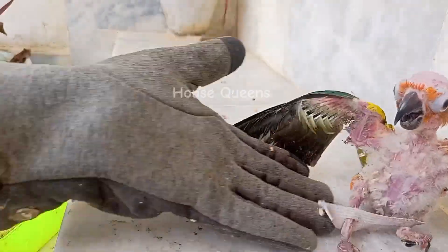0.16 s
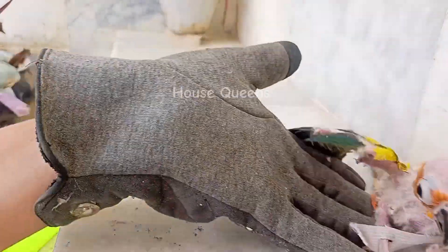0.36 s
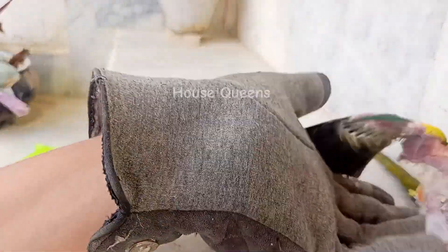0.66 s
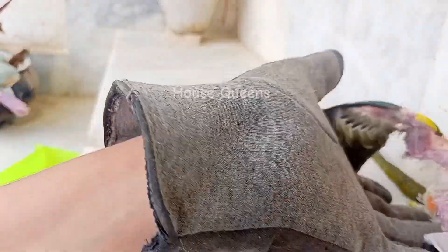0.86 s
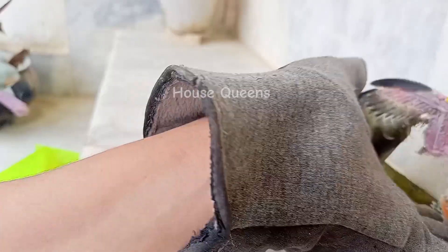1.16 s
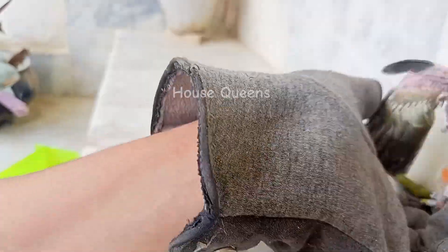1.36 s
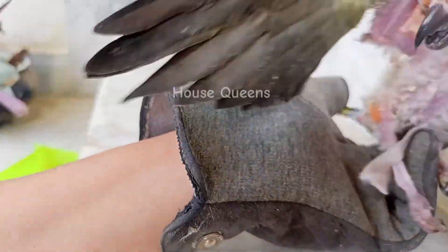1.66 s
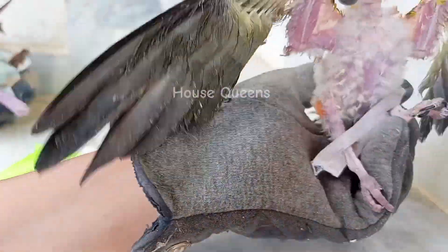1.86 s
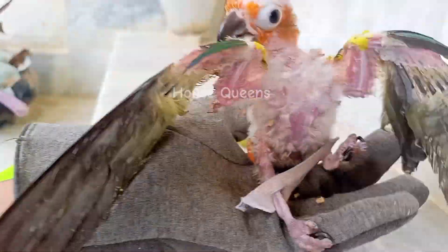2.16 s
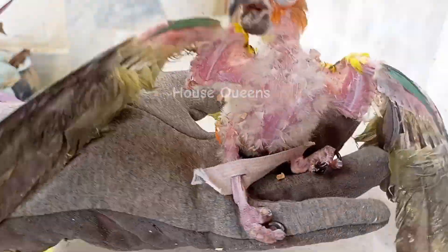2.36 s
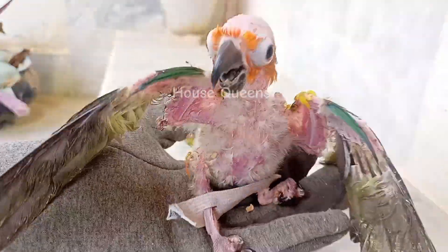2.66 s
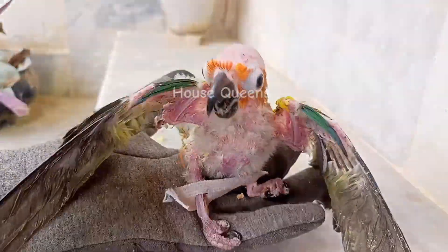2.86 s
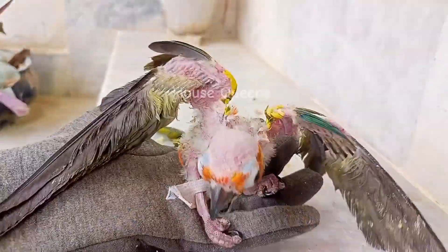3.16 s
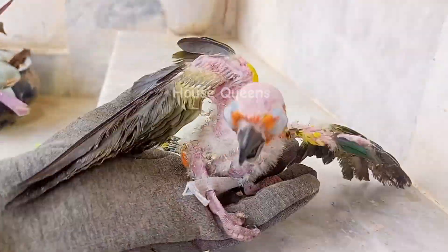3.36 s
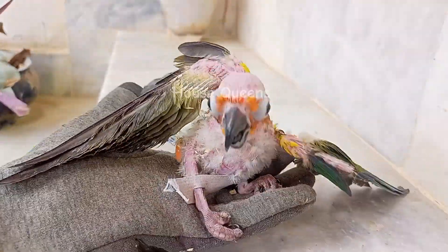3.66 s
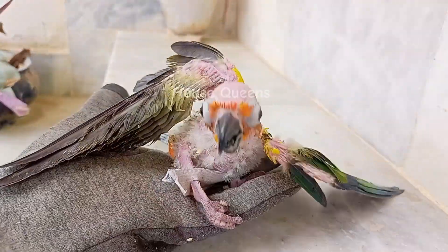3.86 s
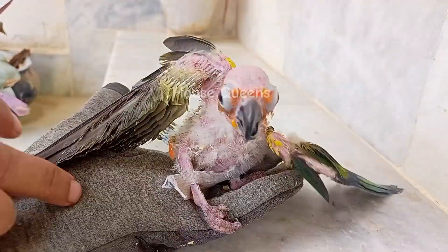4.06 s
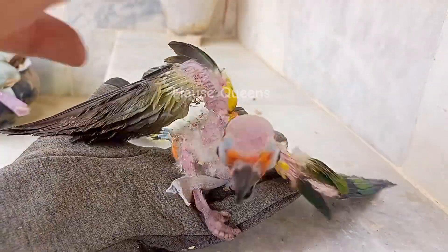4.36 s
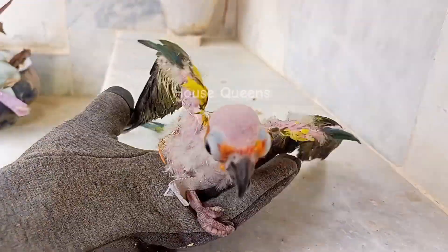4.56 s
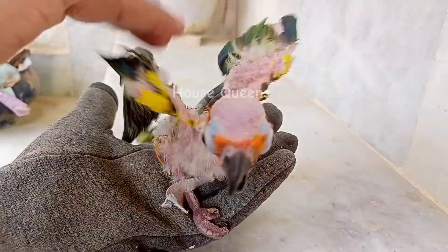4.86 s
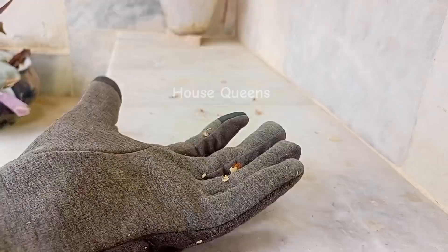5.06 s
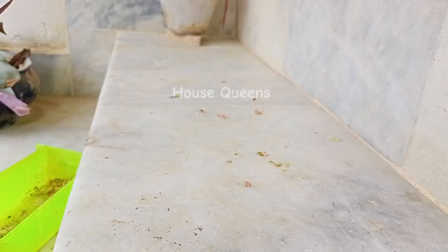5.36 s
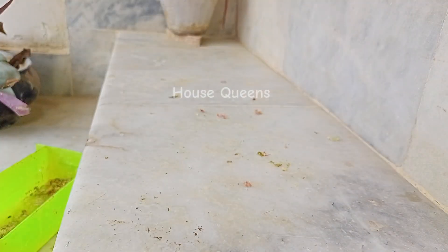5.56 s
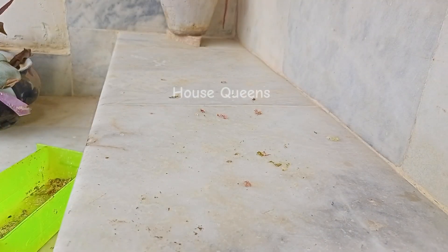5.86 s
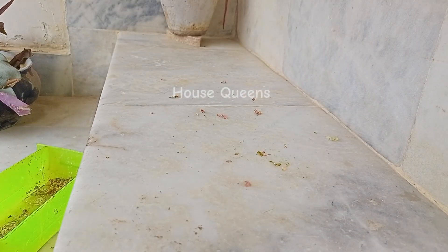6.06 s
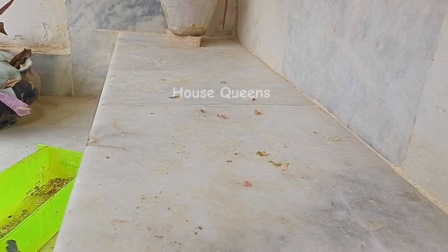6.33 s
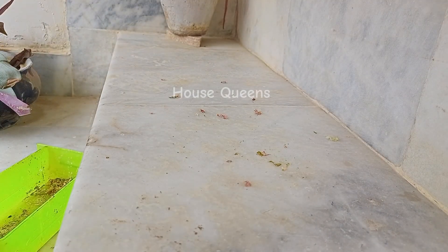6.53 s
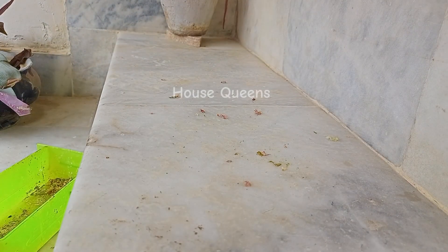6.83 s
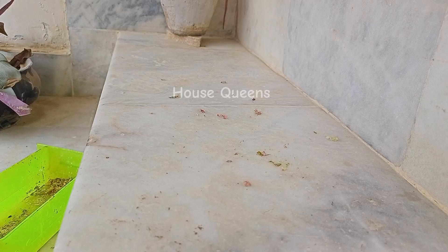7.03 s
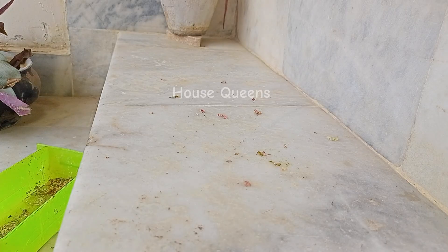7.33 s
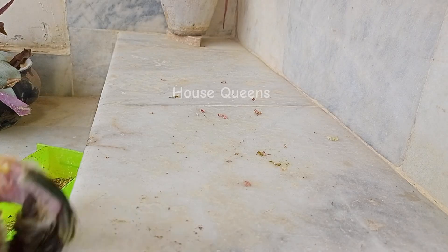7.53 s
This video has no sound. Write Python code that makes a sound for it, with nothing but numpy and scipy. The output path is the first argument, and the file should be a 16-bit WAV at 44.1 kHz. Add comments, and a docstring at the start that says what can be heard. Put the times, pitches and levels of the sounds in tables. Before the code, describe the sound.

Close to the microphone in a small tiled room, a parrot chick gives hoarse, rapid begging rasps and a sharp early squawk. The calls thin out with faint feather rustles, then three harsh squawks burst out in a row, followed by a brief stuttering squeak at take-off. After near quiet comes a soft landing thud, a stuttering protest, a faint wing rustle and final squawks, all over a low dull hum.

```python
"""Over a low room hum, a parrot chick on a gloved hand in a small tiled room begs in hoarse rasps and harsh squawks.
Its wings rustle; then it flutters off with a stuttering squeak, lands with a soft thud and protests and squawks again.
The voice is a stack of harmonics mixed with rough noise; the stutters are rows of short upward-sliding pulses.
Wings and room are shaped noise, the thuds are a few dying sine tones, and a fading noise makes the echo."""
import sys
import numpy as np
from scipy import signal
from scipy.fft import rfft, irfft, next_fast_len
from scipy.io import wavfile
from scipy.ndimage import uniform_filter1d, map_coordinates

SR = 44100
rng = np.random.default_rng(int(sys.argv[2]) if len(sys.argv) > 2 else 0)


def generate_wav(sig):
    """Save sig (samples, or channels by samples) to the path in sys.argv[1] as 16-bit PCM at SR."""
    pcm = np.round(np.clip(np.atleast_2d(sig).T, -1, 1) * 32767).astype(np.int16)
    wavfile.write(sys.argv[1], SR, pcm)


N = 339129
TIME = np.arange(N) / SR
TOP_HZ = 15850  # the microphone's upper limit

# Colour of the hoarse noise in the voice. Each row: frequency in Hz, relative level in dB per Hz.
RASP_COLOUR = [(1000, -50.5), (1700, -17), (2050, -24), (2330, -5.5), (2720, -3), (2960, 0), (3800, -6),
               (4090, -3), (5110, -10), (5660, -12), (6680, -17), (8420, -13), (9940, -27.5),
               (13400, -29.5), (15500, -35)]


def amp(db):
    """Turn decibels into a plain factor."""
    return 10 ** (np.asarray(db) / 20)


def unit(x):
    """Scale a sound to an rms (average strength) of 1."""
    return x / np.sqrt(np.mean(x ** 2) + 1e-20)


def along(points, hz):
    """Read a curve of (Hz, value) points, with frequency on a log axis."""
    f, v = np.transpose(points)
    return np.interp(np.log(hz + 1), np.log(f), v)


def wobble(rate, n):
    """A smooth random curve of n samples, through `rate` random points a second."""
    knots = rng.standard_normal(int(n * rate / SR) + 4)
    return map_coordinates(knots, [np.arange(n) * rate / SR])


def filtered(x, response):
    """Strengthen or weaken each frequency of x by response(hz)."""
    m = next_fast_len(len(x) + 8192)
    spectrum = rfft(x, m) * response(np.fft.rfftfreq(m, 1 / SR))
    return irfft(spectrum, m)[:len(x)]


def noise(colour):
    """Random hiss with the given colour and an rms of 1."""
    return unit(filtered(rng.standard_normal(N), lambda hz: amp(along(colour, hz))))


def fuzzy_tone(centre_hz, width_hz):
    """Noise squeezed into a narrow band sounds like a blurred tone; its rms is 1."""
    return unit(filtered(rng.standard_normal(N), lambda hz: 1 / (1 + ((hz - centre_hz) / width_hz * 2) ** 2)))


def swell(centre, length):
    """Samples and height of one smooth bump that rises and falls."""
    at = np.flatnonzero(abs(TIME - centre) < length / 2)
    u = (TIME[at] - centre) / length
    return at, np.cos(np.pi * u) ** 2


def background(air_db=0.58, hum_db=-1.1):
    """Dull, slowly wavering room noise, with blurred hum and thin hiss, and a faint far tone fading away early on."""
    # Each row: time in seconds, room noise level in dB before air_db is added.
    air_levels = [(0.0, -37), (2.74, -39.5), (2.96, -38), (7.69, -43)]
    # Each row: frequency in Hz, relative level in dB per Hz.
    air_colour = [(12, -59), (20, -17), (54, -7.5), (116, -2.5), (207, -4.5), (238, 3), (306, -7),
                  (382, -6), (705, -11), (857, -12), (1380, -15.5), (1980, -17), (3540, -24), (6360, -48.5),
                  (15500, -56)]
    # Hum and hiss. Each row: centre in Hz, width in Hz, level in dB before hum_db is added.
    hum_bands = [(94.4, 72, -48.5), (239, 98, -52.5), (7900, 1800, -71)]
    # The far tone: centre in seconds, length in seconds, frequency in Hz, level in dB at its centre.
    whine = (-1, 5.5, 886, -41)
    s, db = np.transpose(air_levels)
    level_db = np.interp(TIME, s, db) + air_db + 0.51 * wobble(5.28, N)
    out = amp(level_db) * noise(air_colour)
    for hz, width, level in hum_bands:
        out += amp(level + hum_db) * fuzzy_tone(hz, width)
    centre, length, hz, level = whine
    at, bump = swell(centre, length)
    out[at] += amp(level) * bump * fuzzy_tone(hz, width_hz=100)[at]
    return out


def syrinx(pitch, half_db, fading_db=0, fundamental_db=0, count=14):
    """The bird's voice box: harmonics shaped by the throat; period doubling adds lines halfway between them."""
    # Throat and open beak. Each row: frequency in Hz, gain in dB.
    throat = [(750, 12.5), (1200, 1), (1600, -6), (2200, -5.5), (3200, 0), (4550, -3), (4900, -11.5),
              (5400, -14), (6400, -20.5), (7200, -22), (8100, -9.5), (9200, -25.5), (10500, -38.5),
              (15000, -39)]
    k = np.arange(2, count + 1)[:, None] / 2  # 1, 1.5, 2, 2.5 .. times the pitch
    line_hz = k * pitch
    phase = 2 * np.pi * (k * np.cumsum(pitch) / SR + rng.random(k.shape))
    fading = fading_db * np.array([wobble(119.2, len(pitch)) for _ in k])  # each line on its own
    level_db = along(throat, line_hz) + half_db * (k % 1 > 0) + fundamental_db * (k == 1) + fading
    gain = amp(level_db) * (line_hz < TOP_HZ)
    return unit(np.sum(gain * np.sin(phase), axis=0))


def note(glide, half_db, fundamental_db, rough, throb_hz=75, throb_db=3.5, bend=0.02, waver=0.0208, jitter=0.027):
    """A gliding tone that wavers and throbs unevenly, its pitch rising through the peak of each throb."""
    # rough scales throb_db and the three pitch shares: bend, waver and jitter
    n = len(glide)
    uneven_hz = throb_hz * np.exp(.5 * wobble(89.6, n))
    beat = 2 * np.pi * np.cumsum(uneven_hz) / SR
    unsteady = bend * np.sin(beat) + waver * wobble(109.3, n) + jitter * wobble(1100, n)
    tone = syrinx(glide * (1 + rough * unsteady), half_db, fading_db=3.0, fundamental_db=fundamental_db)
    return unit(tone * amp(rough * throb_db * np.cos(beat)))


def rasp(patchy_db=4.5, flutter_db=1.5):
    """A chaotic voice box: fluttering noise whose resonances come and go."""
    z = signal.stft(noise(RASP_COLOUR), nperseg=512)[2]
    field = rng.standard_normal(z.shape)
    field = uniform_filter1d(field, size=6, axis=0)  # smooth over frequency
    field = uniform_filter1d(field, size=9, axis=1)  # smooth over time
    hoarse = signal.istft(z * amp(patchy_db * unit(field)), nperseg=512)[1][:N]
    return hoarse * amp(flutter_db * wobble(420, N))


def push_of_air(start, length, rise, steepness=0.92):
    """Samples, progress (0 to 1) and pressure of one call: it swells for the share `rise`, then ebbs."""
    at = np.flatnonzero((TIME > start) & (TIME < start + length))
    u = (TIME[at] - start) / length
    angle = np.interp(u, [0, rise, 1], [0, np.pi / 2, 0])
    return at, u, np.sin(angle) ** steepness


def call(glide, hoarse, share, half_db, fundamental_db, rough, treble_db, beak_hz=6100, gather_db=2.0):
    """Part tone and part rasp, gathered around the same harmonics; a wider beak lets out more treble."""
    chaos = unit(filtered(hoarse, lambda hz: amp(gather_db * np.cos(2 * np.pi * hz / glide.mean()))))
    share = np.clip(share, 0, 1)
    tone = note(glide, half_db, fundamental_db, rough)
    voice = np.sqrt(share) * tone + np.sqrt(1 - share) * chaos
    return filtered(voice, lambda hz: amp(treble_db * (1 - 1 / (1 + (hz / beak_hz) ** 10))))


def begging(half_db=-22, fundamental_db=3, treble_db=-0.5, hoarse_rough=0.95, pure_rough=0.49):
    """Hoarse calls whose pitch glides or holds; the less tone in a call, the rougher that tone."""
    # Each row: start in seconds, length in seconds, level in dB before the mix,
    # pitch in Hz halfway through, glide in octaves, share of tone from 0 to 1.
    begs = [ (0.043, 0.063, -33, 2720, -.13, 0.32), (0.275, 0.092, -46.5, 6980, .05, .7),
            (0.569, 0.23, -29, 3500, -0.13, 0.16), (0.736, 0.095, -26, 4150, .14, 0.76),
            (0.801, 0.2, -29.5, 4690, -0.091, 0.43), (0.943, 0.1, -20, 3936, -.12, .75),
            (1.009, 0.14, -27.5, 3100, 0.13, 0.02), (1.081, 0.13, -31, 6060, .08, 0.38),
            (1.238, 0.13, -28.5, 2950, 0.4, 0.2), (1.376, 0.1, -26.5, 4130, 0, 0.32),
            (1.439, 0.072, -23.5, 3450, -0.045, 0.5), (1.604, 0.06, -28.5, 6180, 0, 0.71),
            (1.76, 0.067, -31, 5800, -0.019, 0.63), (1.857, .11, -23.5, 2824, 0.25, 0.15),
            (1.985, 0.092, -25, 4120, 0.17, 0.4), (2.053, 0.14, -36, 2015, 0.18, 0.68),
            (2.172, 0.17, -26.5, 3135, 0.13, 0.28), (2.265, 0.19, -27, 3830, .25, 0.22),
            (2.42, 0.098, -27.5, 3970, -0.13, 0.25), (2.557, 0.16, -28, 3080, -.04, 0.07),
            (2.674, 0.069, -25, 1985, -0.072, 0.9), (2.955, 0.065, -33, 2574, .04, 0.2),
            (3.017, .075, -34.5, 4660, .07, 0.56), (3.178, 0.096, -40, 4100, 0.098, .5),
            (3.694, .17, -40, 3060, -0.18, 0.23), (3.85, 0.071, -31, 1584, 0.0054, 0.83),
            (4.035, 0.043, -35, 5240, -0.068, 0.47), (4.052, 0.12, -30, 4060, 0.16, 0.26),
            (4.16, 0.13, -27, 4190, 0.1, 0.4), (4.837, .04, -37.5, 4460, -0.032, .65),
            (5.974, 0.099, -33.5, 3180, 0.008, 0.03), (6.512, 0.067, -49, 4770, -0.084, 0.5),
            (7.567, 0.094, -32, 2790, 0.049, .85), (7.577, 0.086, -27, 5430, -0.26, 0.83),
            (7.66, 0.04, -30, 4120, -.04, 0.27)]
    out, hoarse = np.zeros(N), rasp()
    for start, length, db, hz, octaves, share in begs:
        at, u, push = push_of_air(start, length, rise=0.3)
        glide = hz * 2 ** (octaves * (u - .5))
        rough = np.interp(share, [0, 1], [hoarse_rough, pure_rough])
        out[at] += amp(db) * push * call(glide, hoarse[at], share, half_db, fundamental_db, rough, treble_db)
    return out


def room(x, delay=.004):
    """Hard walls answer after `delay` seconds; each frequency dies at its own speed."""
    # Each row: frequency in Hz, time in seconds to die away by 60 dB.
    fade_times = [(300, 0.33), (3000, 0.32), (8000, 0.24), (15000, 0.35)]
    hz, t, z = signal.stft(rng.standard_normal(SR // 2), SR, nperseg=256)
    fade = amp(-60 * t / along(fade_times, hz)[:, None])
    tail = signal.istft(z * fade, SR, nperseg=256)[1]
    echo = np.pad(tail / np.linalg.norm(tail), (round(delay * SR), 0))
    return signal.fftconvolve(x, echo)[:N]


def squawks(fundamental_db=-0.5, treble_db=2.5, mid_half_db=-7.5, doubling_grows_db=12):
    """Pushed hard, the voice sags in pitch and slips further and further into period doubling."""
    # Each row: start in seconds, length in seconds, level in dB before the mix,
    # pitch in Hz halfway through, glide in octaves.
    squawk_list = [(0.097, 0.12, -18, 2207, -.1), (4.233, 0.11, -16, 2292, -.19),
                   (4.346, 0.15, -16.5, 2206, -.19), (4.493, .135, -18, 2192, -.17),
                   (6.146, 0.0963, -17.5, 1580, -.06), (7.338, 0.15, -18.5, 2082, -.24),
                   (7.441, 0.11, -21, 2255, -.02)]
    out, hoarse = np.zeros(N), rasp()
    for start, length, db, hz, octaves in squawk_list:
        at, u, push = push_of_air(start, length, rise=0.38)
        glide = hz * 2 ** (octaves * (u - .5))
        half_db = mid_half_db + doubling_grows_db * (u - .5)
        voice = call(glide, hoarse[at], 0.89, half_db, fundamental_db, rough=0.8, treble_db=treble_db)
        out[at] += amp(db) * push * voice
    return out


def wings(grain_db=3.5):
    """Feathers scrape in short grainy strokes of noise."""
    # Each row: centre in seconds, length in seconds, level in dB at the centre.
    rustles = [(0.505, 0.026, -45), (3.324, 0.074, -51), (3.507, 0.05, -47), (6.843, 0.36, -46.5)]
    colour = [(500, 2.0), (3500, -1), (6000, -16.5), (8000, -10), (10500, -35), (15000, -28)]  # Hz, dB
    feathers = unit(noise(colour) * amp(grain_db * wobble(300, N)))
    out = np.zeros(N)
    for centre, length, db in rustles:
        at, bump = swell(centre, length)
        out[at] += amp(db) * bump * feathers[at]
    return out


def stutter(cry, break_s, slow_gap_s, settled_db, scrape_db=-19, thin_db=-12, jitter=0.02):
    """In alarm the voice breaks into upward-sweeping pulses: quick while the cry builds, slower once it breaks out."""
    # The beak's colour in alarm. Each row: frequency in Hz, gain in dB.
    beak = [(800, 1), (1300, -8), (2400, -3.5), (3300, 5.5), (4200, -5.5), (4900, -8.5), (6400, -2.5),
            (8300, -3.5), (11000, 0.5)]
    quick_gap_s, rise_s, decay_s = 0.0068, 0.0018, 0.0015
    scoop_oct, scoop_s = 0.54, 0.0037  # each pulse starts this far flat and slides up to pitch
    tail_db, tail_s = -13.5, 0.014  # a soft whistle lingers after each pulse
    s, pitch_hz, level_db = np.transpose(cry)
    quick = np.arange(break_s - quick_gap_s, s[0], -quick_gap_s)  # counted backward from the break
    slow = np.arange(break_s, s[-1], slow_gap_s)
    out, scrape = np.zeros(N), amp(scrape_db) * noise(RASP_COLOUR)
    t = np.arange(SR // 50) / SR
    shape = (1 - np.exp(-(t / rise_s) ** 2)) * np.exp(-t / decay_s)
    whistle = amp(tail_db) * np.sin(np.pi * np.minimum(t / tail_s, 1)) ** 2
    shape = shape / shape.max() + whistle
    strain = np.exp(-t / scoop_s)  # a pulse begins flat and thin; its fundamental fills in as it settles
    fundamental_db = thin_db * strain + settled_db * (1 - strain)
    for start in np.r_[quick, slow]:
        at = round(start * SR) + np.arange(len(t))
        pitch = np.interp(start, s, pitch_hz) * 2 ** (-scoop_oct * strain)
        pitch = pitch * (1 + jitter * wobble(1190, len(t)))
        tone = syrinx(pitch, half_db=-45, fundamental_db=fundamental_db)
        out[at] += amp(np.interp(start, s, level_db)) * shape * (tone + scrape[at])
    return filtered(out, lambda hz: amp(along(beak, hz)))


def take_off_cry():
    """A stuttering squeak as the bird flutters off."""
    # Each row: time in seconds, settled pitch in Hz, level in dB before the beak's colour.
    cry = [(4.86, 770, -27.5), (4.883, 1770, -13), (4.897, 2456, -6.5), (4.912, 2720, -5),
           (4.925, 3020, -20), (4.945, 2680, -8)]
    return stutter(cry, break_s=4.883, slow_gap_s=0.0136, settled_db=2)


def thuds(attack=0.00051):
    """Soft blows of the bird's body, at push-off and landing, ring a few dull tones that die away."""
    # Each row: time in seconds, level in dB.
    blows = [(4.912, -33), (5.679, -34.5), (5.687, -26.5)]
    # What the blows ring. Each row: frequency in Hz, typical level in dB, time in seconds to fade by 60 dB.
    modes = [(210, 3, 0.072), (585, 1, 0.064), (684, 6.5, 0.036), (1710, -6.5, 0.063)]
    out = np.zeros(N)
    t = np.arange(SR // 4) / SR
    for s, db in blows:
        ring = np.zeros(len(t))
        for hz, level, t60 in modes:
            varied_db = level + rng.normal(0, 1)  # no two blows ring alike
            ring += amp(varied_db - 60 * t / t60) * np.sin(2 * np.pi * hz * t)
        out[round(s * SR):][:len(t)] += amp(db) * ring * (1 - np.exp(-t / attack))
    return out


def protest_cry():
    """A second stuttering cry of alarm, after the landing."""
    # Each row: time in seconds, settled pitch in Hz, level in dB before the beak's colour.
    cry = [(6.122, 1720, -28), (6.147, 1730, -37), (6.159, 1900, -22), (6.166, 1950, -8.5),
           (6.211, 1867, -12), (6.225, 1900, -25)]
    return stutter(cry, break_s=6.1667, slow_gap_s=0.0112, settled_db=5)


def scene(call_db=-0.13, call_room_db=-6.0, near_room_db=-14):
    """Mix all sounds; the stuttering cries, wings and thuds get less echo than the calls."""
    voice = amp(call_db) * (begging() + squawks())
    near = wings() + take_off_cry() + thuds() + protest_cry()
    echo = room(amp(call_room_db) * voice + amp(near_room_db) * near)
    return (voice + near + echo + background())[None]


def record(dry):
    """The microphone keeps nothing above its upper limit."""
    return filtered(dry[0], lambda hz: hz < TOP_HZ)[None]


dry = scene()
out = record(dry)
generate_wav(out)
```